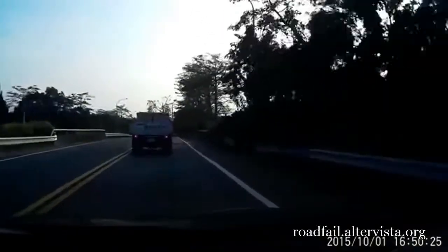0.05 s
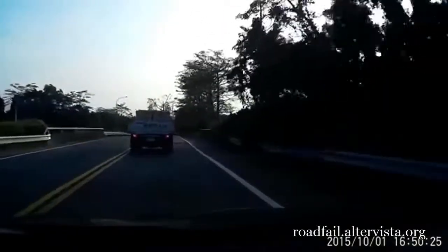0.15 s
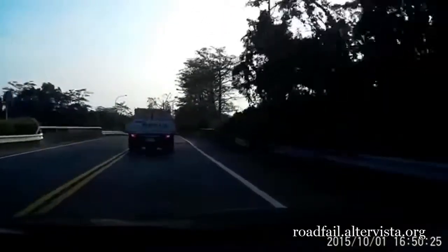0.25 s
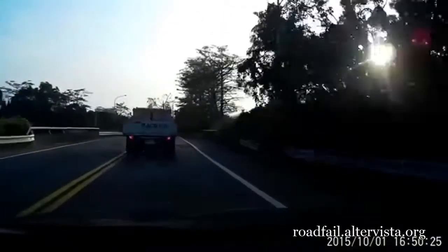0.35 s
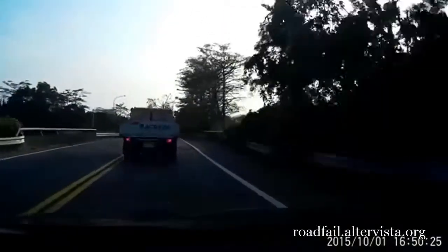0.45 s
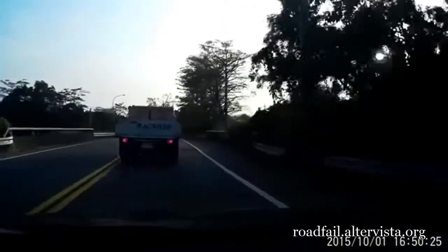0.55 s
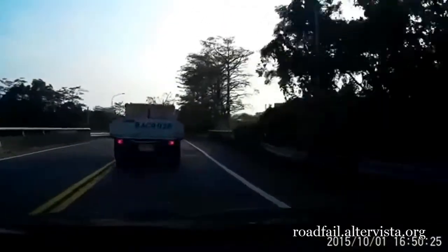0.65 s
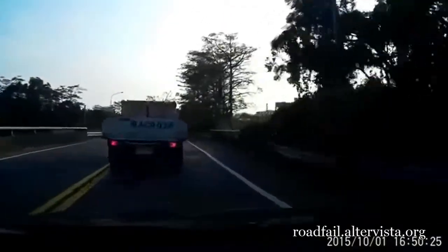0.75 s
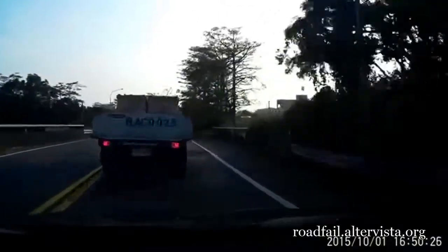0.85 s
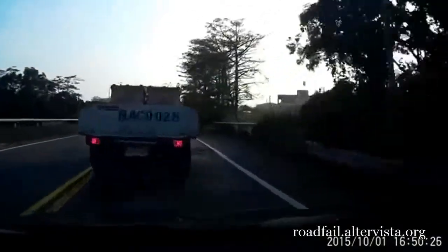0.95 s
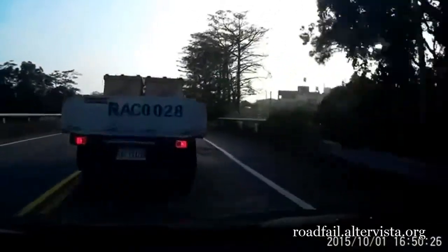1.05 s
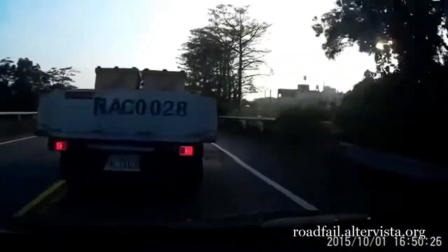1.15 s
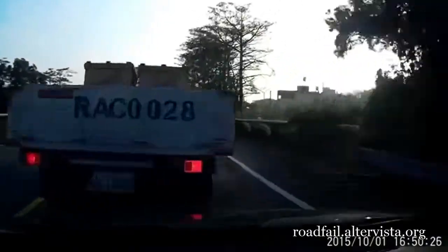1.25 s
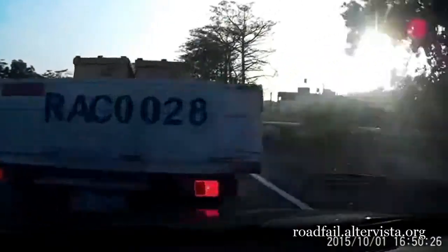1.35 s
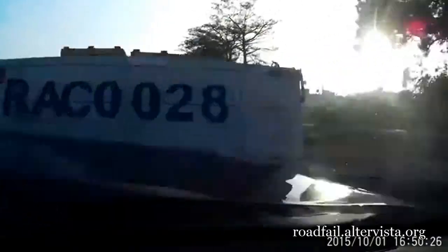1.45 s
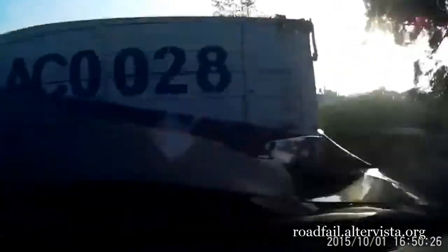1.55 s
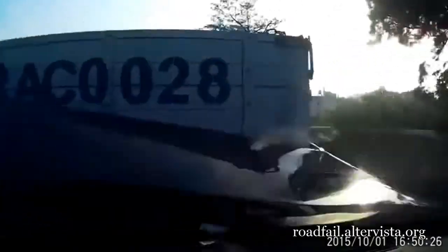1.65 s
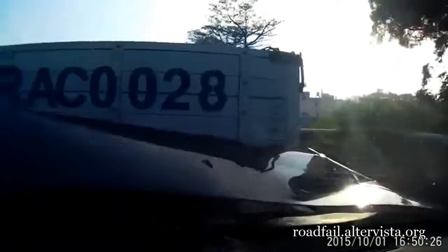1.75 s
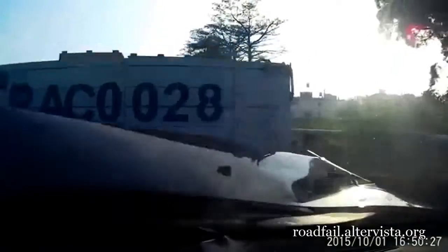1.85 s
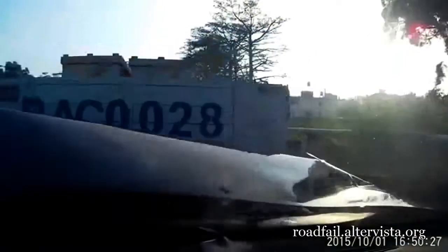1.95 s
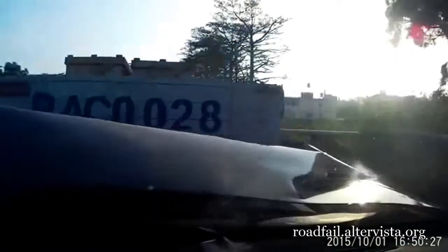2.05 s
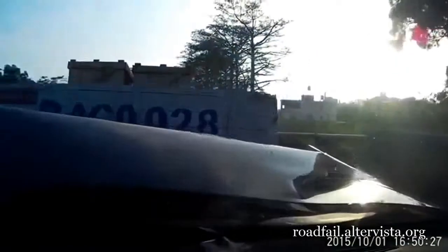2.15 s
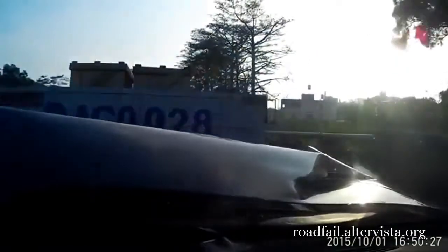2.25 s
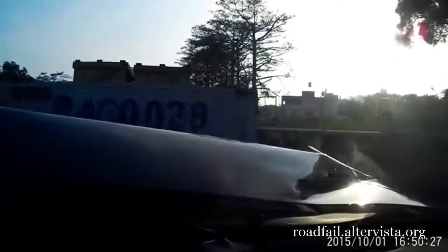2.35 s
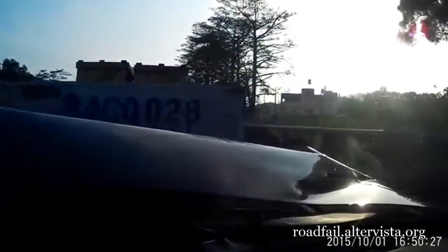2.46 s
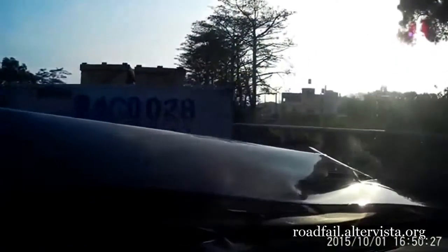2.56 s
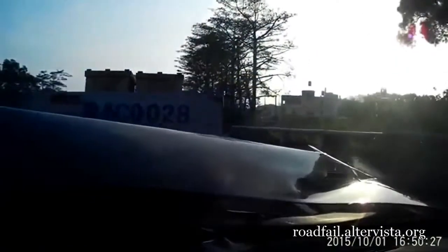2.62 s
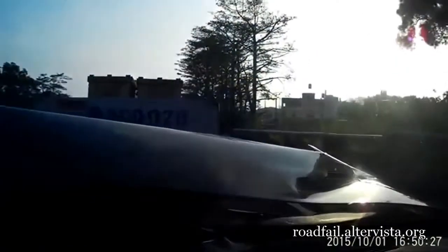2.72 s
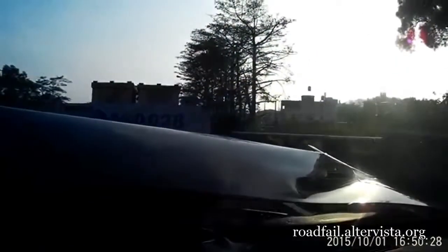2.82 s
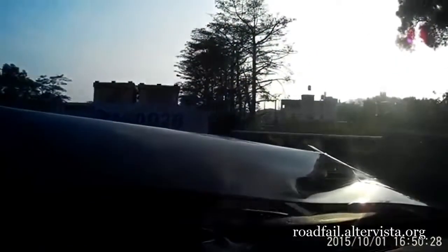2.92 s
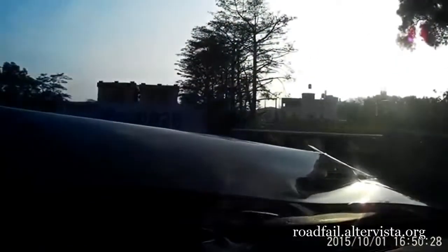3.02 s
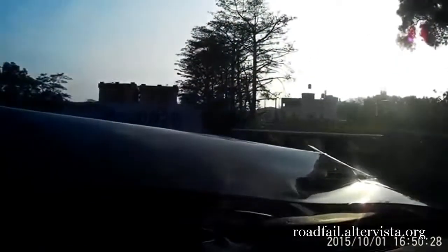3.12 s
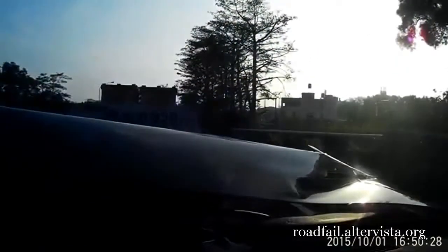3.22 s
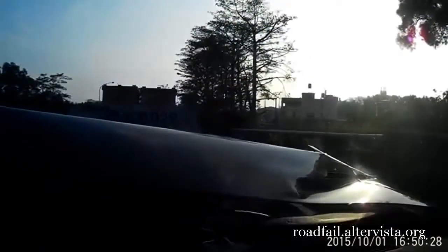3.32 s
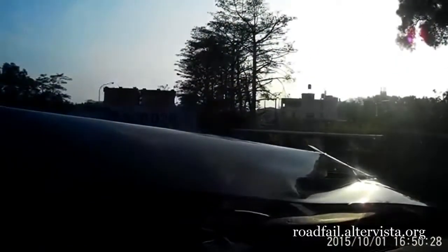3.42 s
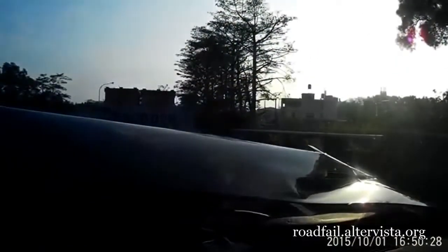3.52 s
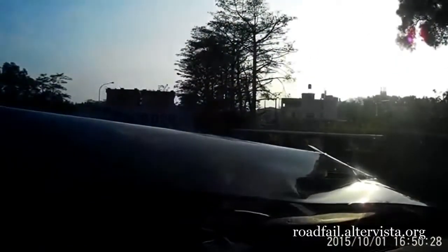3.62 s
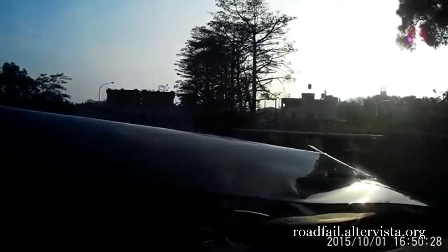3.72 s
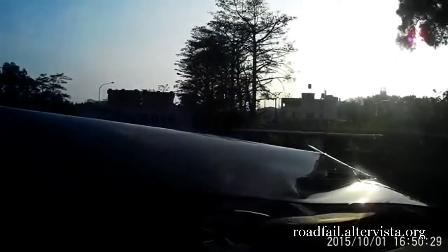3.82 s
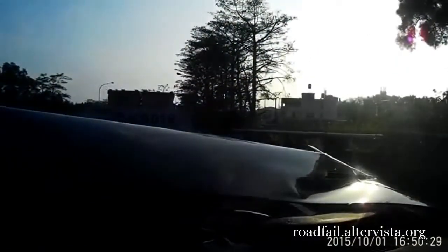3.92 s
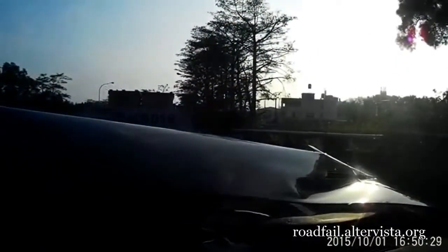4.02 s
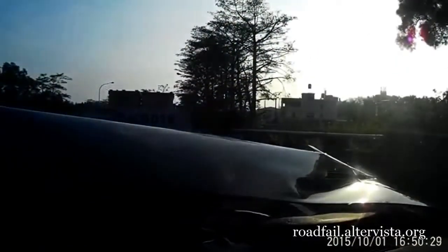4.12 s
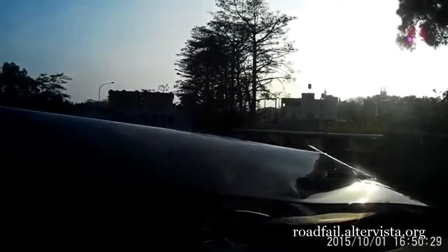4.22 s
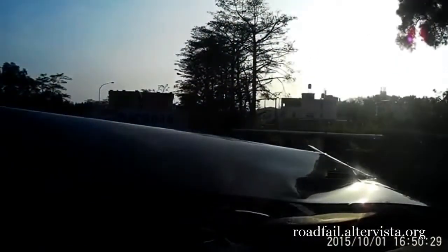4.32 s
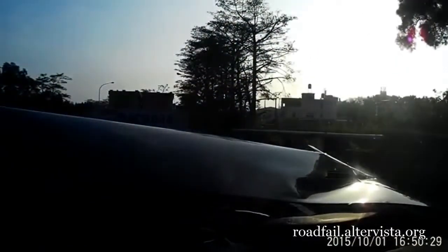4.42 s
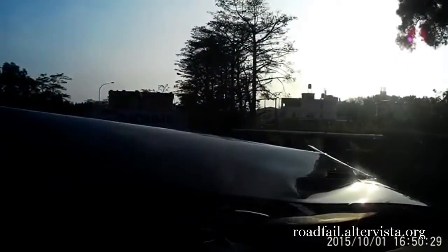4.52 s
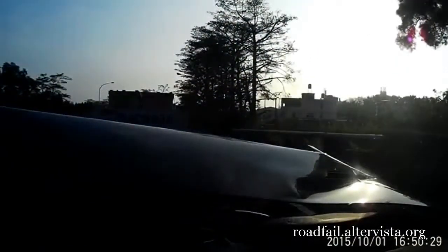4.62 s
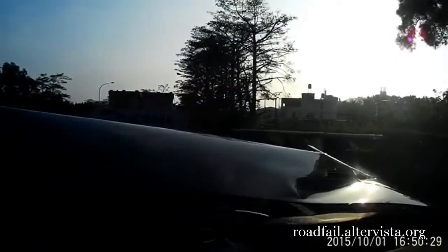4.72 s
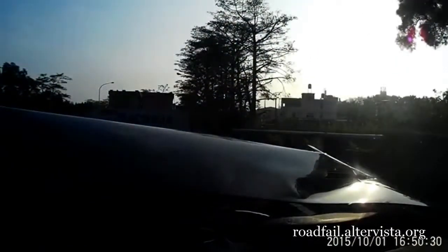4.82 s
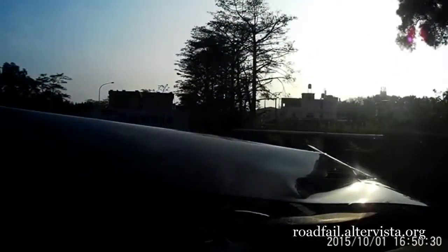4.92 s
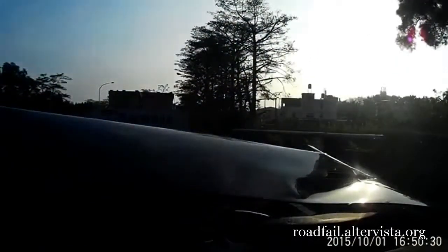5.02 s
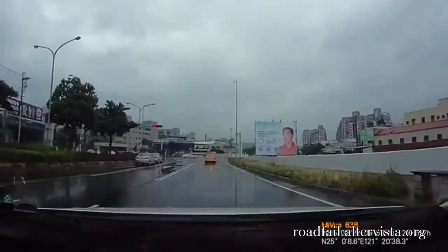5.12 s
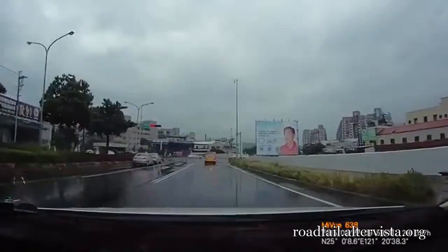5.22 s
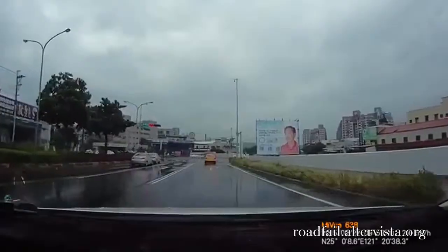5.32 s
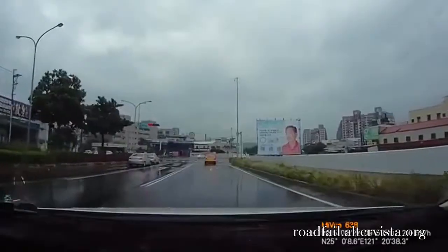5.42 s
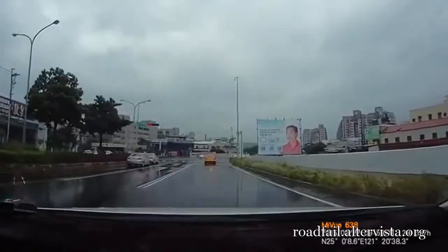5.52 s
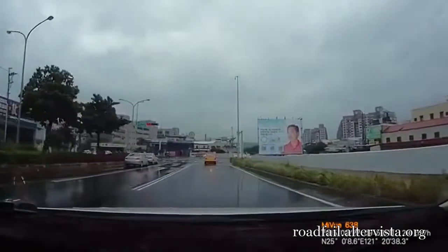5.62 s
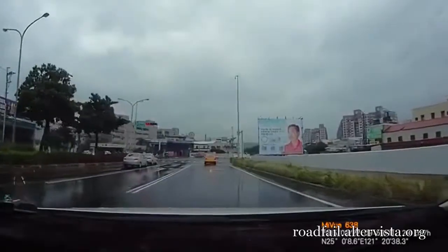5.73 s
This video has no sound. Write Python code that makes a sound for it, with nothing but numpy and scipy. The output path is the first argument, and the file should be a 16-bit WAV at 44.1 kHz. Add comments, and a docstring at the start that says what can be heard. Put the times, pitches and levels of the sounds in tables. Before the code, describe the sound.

Close, dry car cabin with a slightly saturated microphone. Tyres hum under braking over deep road rumble; the front end then crunches into a truck in repeated blows, with deep lurches, sheet metal folding, sharp trim cracks and gritty splinters. Late snaps and a creak trail off into throbbing, clattering idle, which stops abruptly into silence.

```python
"""A car runs into the back of a truck, heard from inside the car: thuds, buckling metal, cracking plastic.
Random fractures and short blows excite banks of resonances: body, panels, dashboard, trim and splinters.
Metal scrapes and creaks and fragments trickle down; slow swings of the body add deep lurches.
Braking tyres drone beforehand over road roar, which is shaped noise; the engine's firing harmonics idle on.
Faint hiss and a thin whine lie beneath, until everything stops dead."""
import sys
import numpy as np
from scipy import signal
from scipy.fft import rfft, irfft
from scipy.io import wavfile

SR = 44100
rng = np.random.default_rng(int(sys.argv[2]) if len(sys.argv) > 2 else 0)


def persist_wave(psi):
    """Save psi, clipped to +-1, as 16-bit WAV."""
    counts = np.round(np.clip(psi, -1, 1) * 32767).astype(np.int16)
    wavfile.write(sys.argv[1], SR, np.atleast_2d(counts).T)


N = 254632
TIME = np.arange(N) / SR

# Shoves in which the front end gives way; levels hold at mid-shove:
# (start [s], length [s], force [dB], dashboard judder re force [dB], breaking trim re force [dB])
CRUSHES = [(0.869, 0.34, -37, -7.5, -15), (1.115, 0.15, -30.5, -5, -10), (1.278, 0.14, -32, 4.5, -8),
           (1.447, 0.099, -27, -12, -22.5), (1.515, 0.091, -27.5, -1, -11.5),
           (1.606, .16, -23.5, -2.5, -9.5), (1.796, 0.24, -32, -5.5, -14), (2.05, 0.1, -26, -5, -17.5),
           (2.25, 0.089, -29, -12, -32), (2.383, .20, -27, -13, -31), (2.602, 0.15, -30, -4.5, -21),
           (2.802, 0.075, -35, -5.5, -17.5), (2.883, .09, -31.5, -2.5, -15),
           (2.992, 0.094, -41.5, 0.5, -6.5)]
# Heavy blows, levels before cabin reflections:
# (start [s], body peak [dB], panel re body [dB], panel pitch [Hz], decay of force [s])
THUDS = [(0.904, -9, 0, 316, 0.0066), (1.097, -15, -6, 347, 0.025), (1.3, -10, 0.5, 208, 0.0061),
         (1.347, -13, 0, 338, 0.016), (1.374, -12, -8, 506, 0.02), (1.527, -14.5, -7, 490, 0.01),
         (1.596, -14, 1.5, 240, 0.0093), (1.61, -17, 2, 222, 0.0088), (1.676, -11.5, -7, 220, 0.018),
         (1.73, -17, 7.5, 206, 0.0087), (2.131, -16, -6, 245, 0.0076), (2.244, -23, 2, 251, 0.0062),
         (2.394, -15.5, -3.5, 243, 0.0085), (2.419, -20, 2, 259, 0.012), (2.586, -31.5, 15, 332, 0.0078),
         (2.696, -24, 8, 266, 0.0053), (2.925, -27, -3.5, 460, 0.01)]
# Modes of a struck panel: (multiple of its pitch [1], width [Hz], level [dB])
PANEL_MODES = [(.68, 70, -4.5), (1, 56.1, 7.5), (1.4, 90, -6.5), (1.9, 120, -7)]
# Snaps of plastic and metal, levels before cabin reflections:
# (start [s], trim peak [dB], dashboard knock re trim [dB], splinter re trim [dB], decay of trim force [s])
CRACKS = [(.749, -29.5, -1, -13, 0.014), (.794, -30, 6, -3, .006), (.893, -30, 4, -8, .008),
          (.903, -25.5, 11, -8, 0.016), (1.077, -28.5, 8.5, -19, 0.0044), (1.147, -21.5, 4, -6.5, 0.0085),
          (1.176, -18, 7.5, -6, 0.01), (1.299, -28, 14.5, -8, 0.0027), (1.347, -28, 9.5, -20.5, 0.0079),
          (1.374, -18, 2.5, -3.5, 0.002), (1.391, -18, 1, -25.5, .0043), (1.415, -31, 11, -22.5, 0.0032),
          (1.503, -37, 16, -14.5, 0.007), (1.532, -22, 7, -21, 0.0078), (1.592, -24, 8.5, -16.5, 0.011),
          (1.609, -23.5, 10, 10, .001), (1.634, -24, 1, 6.5, 0.0021), (1.684, -29, 12.5, -1, 0.0057),
          (1.730, -17, 6, -6, .006), (1.739, -23, 4, -3.5, .014), (1.840, -29.5, 3, -12.5, 0.011),
          (1.912, -27, -1, -18, .003), (1.927, -34, -7, -19, 0.0032), (1.983, -38.5, 6, -25, .0036),
          (2.060, -25.5, 8.5, -17, 0.0039), (2.112, -36, -10, -21, .002), (2.132, -23.5, -4, -19, 0.0036),
          (2.151, -26.5, 2, -16, 0.0027), (2.262, -46.5, -4.5, -3.5, 0.0062), (2.421, -30, 10, -18, 0.0059),
          (2.606, -33, 11, -29.5, .006), (2.670, -23, -11.5, -29.5, 0.0016), (2.701, -13.5, 5, -21, 0.002),
          (2.732, -23.5, 5, -30.5, 0.0031), (2.767, -26, 2, -25, 0.0015), (2.904, -34.5, 13, -18, 0.0052),
          (2.926, -42, 17, -26, 0.0015), (2.949, -28.5, 11.5, -33, 0.0049), (3.045, -29.5, -1, -12, 0.0053),
          (3.071, -38.5, 9, -20, 0.0073), (3.344, -39.5, -16, -18, 0.014), (3.541, -41.5, -14, 0, 0.0048),
          (3.558, -43, -16, -14, 0.011)]
# Resonances of the car body: (frequency [Hz], width [Hz], level [dB])
BODY_MODES = [(34.4, 27, -4), (58.4, 37, -3), (120, 35, -2.5), (220, 19, -16.5)]
# Resonances of the sheet-metal panels: (frequency [Hz], width [Hz], level [dB])
SHEET_MODES = [(235, 32, -1), (344.2, 67, -2), (397.6, 18, -0.5), (461, 40, -12.5), (645, 73, -14)]
# Resonances of the dashboard: (frequency [Hz], width [Hz], level [dB])
DASHBOARD_MODES = [(520, 236, -6.5), (663, 206, -3), (832, 170, -11), (1070, 190, -19.5)]
# Resonances of the trim: (frequency [Hz], width [Hz], level [dB])
TRIM_MODES = [(1395, 65, 4), (1847, 50, 1), (1988, 162, -5), (2705, 270, -9), (3170, 330, -10.5),
              (3750, 87, -16)]
# Resonances of bright splinters and grit: (frequency [Hz], width [Hz], level [dB])
SPLINTER_MODES = [(4130, 1700, 1), (5630, 1000, 4.5), (6060, 380, 4), (6380, 420, 2), (7880, 1300, -2.5),
                  (9250, 400, -0.5), (10160, 1100, -6.5), (13600, 1800, -17)]
# Swings of the whole car on its springs and mounts: (time of crest [s], peak level [dB])
LURCHES = [(1.0, -31), (1.23, -29), (1.38, -27.5), (1.62, -20), (1.692, -13.5), (2.0, -29), (2.151, -27),
           (2.43, -26), (2.529, -21)]
# Metal rubbing on metal: (time [s], pitch [Hz], level [dB])
SCRAPE = [(1.10, 830, -37), (1.18, 890, -28), (1.24, 930, -32), (1.30, 980, -31), (1.36, 914, -41.5),
          (1.42, 835, -41)]
# Creaks of the wreck: (start [s], length [s], starting pitch [Hz], level [dB])
CREAKS = [(2.6, 0.27, 642, -32.5), (2.792, 0.183, 766, -41)]
# Drone of the braking tyres: (time [s], pitch [Hz], level [dB])
TYRE_DRONE = [(0, 370, -34.5), (.15, 374, -35.5), (.3, 369, -38.5), (.5, 376, -36.5), (.68, 376, -33),
              (.84, 371, -33), (.92, 370, -46)]
# Showers of glassy crumbs: (start [s], length [s], level [dB])
SHOWERS = [(0.732, 0.45, -54), (2.853, 0.22, -57)]
# Resonances of the crumbs: (frequency [Hz], width [Hz], level [dB])
CRUMB_MODES = [(3200, 900, 5.5), (5550, 690, 4), (6300, 920, 0.5), (9300, 1500, -12.5), (10700, 580, -11.5)]
# Small falling fragments: (start [s], peak level [dB], pitch [Hz], decay of force [s])
FRAGMENTS = [(2.889, -53, 10800, 0.03), (3.23, -60, 10900, 0.018), (3.235, -57.5, 4760, 0.021),
             (4.348, -42, 5760, 0.007)]
# Roar of the tyres and cabin rumble: (time [s], level [dB])
ROAD_LEVEL = [(0, -29), (.3, -30), (.55, -28.5), (.9, -24.5), (1.7, -30.5), (1.85, -30), (2.3, -30),
              (2.8, -32), (3.1, -45), (3.4, -47.5)]
# Relative spectrum of that roar: (frequency [Hz], level [dB])
ROAD_SPECTRUM = [(15, -28), (25, 13.5), (50, -6.5), (80, -1.5), (120, -0.5), (175, -7.5), (310, -7.5),
                 (450, -9.5), (850, -19), (1150, -27), (1400, -25.5), (1700, -40.5), (3400, -45.5),
                 (4300, -54), (5800, -52), (7200, -58), (15000, -70.5)]
# Mean firing rate of the idling engine: (time [s], rate [firings/s])
IDLE_RATE = [(3.1, 26.7), (3.49, 26.7), (5.2, 27.6)]
# Relative strength of the firing harmonics: (multiple of firing rate [1], level [dB])
FIRING_ORDERS = [(1, -1), (2, -4.5), (3, -17.5), (4, -14), (13, -10.5)]
# Relative spectrum of the engine clatter: (frequency [Hz], level [dB])
CLATTER_SPECTRUM = [(20, -3), (50, 1.5), (110, -0.5), (165, -8.5), (230, -0.5), (370, -3.5), (440, -9),
                    (600, -5), (730, -12), (860, -9), (1100, -19.5), (1400, -18.5), (1700, -33),
                    (3400, -36.5), (4300, -43), (5800, -44), (9000, -56)]
# Course of the hiss and whine, which dip and recover: (time [s], relative level [dB])
HISS_COURSE = [(0, -1.5), (1.2, 4), (1.8, -13), (2.4, -0.5), (2.9, 0.5), (5.27, -2)]

CRUSH_ATTACK_S, CRUSH_RELEASE_S, CRUSH_SLOPE_DB_PER_S = 0.0063, 0.025, -2.5
PANEL_DB = -3.5  # panels against the body
CRACKLE_DB = -7  # lone small snaps against the dense crunch
GRIT_DB, GRIT_FOLLOWS = -46, 1.44  # level at the hardest crunch; exponent of growth with breaking
TRIM_CLICK, KNOCK_CLICK, SPLINTER_CLICK = .14, 0.53, .11  # share of force energy in the single sharp break
KNOCK_LINGERS, SPLINTER_LINGERS = 1.1, 1.4  # force decay as a multiple of that of the trim
SOFT_SNAP_TILT = 0.083  # trim tilt in dB per octave for each dB of relative splinter level
HEAVE_HZ, LURCH_S = 32, .028
CREAK_RISE_HZ_PER_S = 240
SHOWER_ATTACK_S, SHOWER_RELEASE_S = 0.067, .025
RATTLE_DB = -67.5
IDLE_FROM_S, IDLE_RISE_S, IDLE_SETTLE_DB_PER_S = 2.706, 0.49, 1.5
THROB_DB, CLATTER_DB = -36, -37.5
WHINE_HZ, WHINE_DB, HISS_DB = 7950, -75.5, -67
STOP_S, CUTOFF_HZ = 5.265, 15100


def crush_levels():
    """Yielding under load: the powers of successive shoves add, for force, judder and breaking trim."""
    power = np.zeros((3, N))
    for s, length, db, judder_db, trim_db in CRUSHES:
        # the negative slope makes each shove weaken slightly until it lets go
        slope = from_db(CRUSH_SLOPE_DB_PER_S * (np.clip(TIME - s, 0, length) - length / 2))
        shove = slope * swell(s, length, CRUSH_ATTACK_S, CRUSH_RELEASE_S)
        gains = from_db([db, db + judder_db, db + trim_db])
        power += np.outer(gains, shove) ** 2
    return np.sqrt(power)


def folding(force, judder):
    """Impulsive excitation: buckling jerks ring the modes of body, panels and dashboard."""
    jerks = fractures(per_s=900, spread_db=3.0)
    body = rms_one(resonate(jerks, BODY_MODES))
    panels = rms_one(resonate(jerks, SHEET_MODES))
    dashboard = rms_one(resonate(jerks, DASHBOARD_MODES))
    return force * (body + from_db(PANEL_DB) * panels) + judder * dashboard


def crunching(breaking):
    """Fracture noise: clumped and lone breaks ring the trim; grit grows faster than the breaking."""
    clumps = from_db(2.0 * drift(49))
    crunch = rms_one(resonate(clumps * fractures(per_s=1200, spread_db=3.0), TRIM_MODES))
    snaps = fractures(per_s=70, spread_db=1.5)
    crackle = from_db(CRACKLE_DB) * rms_one(resonate(snaps, TRIM_MODES))
    grit_level = from_db(GRIT_DB) * (breaking / breaking.max()) ** GRIT_FOLLOWS
    grit = rms_one(resonate(clumps * fractures(per_s=2600, spread_db=1.5), SPLINTER_MODES))
    return breaking * (crunch + crackle) + grit_level * grit


def thuds():
    """Impact response: a short blow rings the body modes and those of a panel with its own pitch."""
    out = np.zeros(N)
    for s, db, panel_db, panel_hz, decay in THUDS:
        panel = [(multiple * panel_hz, width, level) for multiple, width, level in PANEL_MODES]
        add(out, s, from_db(db) * blow(BODY_MODES, decay, rise=0.0065))
        add(out, s, from_db(db + panel_db) * blow(panel, decay, rise=0.0049))
    return out


def cracks():
    """Brittle fracture: each snap rings trim, dashboard and splinter; a weak splinter means duller trim."""
    out = np.zeros(N)
    for s, db, knock_db, splinter_db, decay in CRACKS:
        tilt = SOFT_SNAP_TILT * splinter_db
        trim = [(hz, width, level + tilt * np.log2(hz / TRIM_MODES[0][0]))
                for hz, width, level in TRIM_MODES]
        snap = blow(trim, decay, rise=0.002754, click=TRIM_CLICK)
        knock = blow(DASHBOARD_MODES, decay * KNOCK_LINGERS, rise=.001, click=KNOCK_CLICK)
        splinter = blow(SPLINTER_MODES, decay * SPLINTER_LINGERS, rise=.0022, click=SPLINTER_CLICK)
        add(out, s, from_db(db) * snap)
        add(out, s, from_db(db + knock_db) * knock)
        add(out, s, from_db(db + splinter_db) * splinter)
    return out


def heaving():
    """Mass on springs: each lurch is a deep sine swing under a Gaussian envelope."""
    out = 0
    for s, db in LURCHES:
        t = TIME - s
        swing = np.sin(2 * np.pi * (HEAVE_HZ * t + rng.random()))
        out = out + from_db(db) * np.exp(-(t / LURCH_S) ** 2) * swing
    return out


def friction():
    """Friction-driven vibration: a nearly clean tyre drone, a hoarse scrape, then rising creaks."""
    out = slide(TYRE_DRONE, width_hz=14, steady=3.2)
    out = out + slide(SCRAPE, width_hz=87)
    for s, length, hz, db in CREAKS:
        pitch = hz + CREAK_RISE_HZ_PER_S * np.clip(TIME - s, 0, length)
        level = from_db(db) * swell(s, length, attack=0.029, release=0.022)
        out = out + level * wavering_tone(pitch, width_hz=47, steady=1.8)
    return out


def slide(rows, width_hz, steady=0):
    """Narrow-band oscillation: a friction tone follows a pitch and level curve."""
    hz, db = in_time(rows)
    return from_db(db) * during(rows) * wavering_tone(hz, width_hz, steady)


def showers():
    """Superposed small impacts: dense random clicks ring the modes of glassy crumbs."""
    flow = sum(from_db(db) * swell(s, length, SHOWER_ATTACK_S, SHOWER_RELEASE_S)
               for s, length, db in SHOWERS)
    return flow * rms_one(resonate(fractures(per_s=2000, spread_db=2.0), CRUMB_MODES))


def fragments():
    """Impact of a small object: a broad tick together with a narrower ring at its own pitch."""
    out = np.zeros(N)
    for s, db, hz, decay in FRAGMENTS:
        modes = [(hz, 220, 0), (hz, hz * .5, -22), (hz * 1.05, 400, -11)]
        add(out, s, from_db(db) * blow(modes, decay, rise=0.0019))
    return out


def rattle():
    """Intermittent contact: loose trim ticks faintly until the first shove."""
    rolling = swell(0, CRUSHES[0][0], attack=0.6, release=.05)
    ticks = fractures(per_s=250, spread_db=3)
    return from_db(RATTLE_DB) * rolling * rms_one(resonate(ticks, [(3400, 690, 4.5), (5530, 986, -2.5)]))


def cabin(x, t60, wet_db):
    """Reverberation: dense, short, decaying reflections from glass and upholstery."""
    t = np.arange(SR // 3) / SR
    echoes = rng.standard_normal(len(t)) * from_db(-60 * t / t60) * (t > .003)
    return x + from_db(wet_db) * signal.fftconvolve(x, echoes / np.linalg.norm(echoes))[:N]


def road():
    """Broadband rolling noise: the roar of the tyres through the floor wanders slightly in level."""
    db, = in_time(ROAD_LEVEL)
    return from_db(db + 1.0 * drift(24)) * noise(ROAD_SPECTRUM)


def engine():
    """Periodic excitation: firing harmonics rock the cabin and the firing phase modulates clatter."""
    rate, = in_time(IDLE_RATE)
    phase = 2 * np.pi * np.cumsum(rate * (1 + 0.0062 * drift(3.3))) / SR
    throb = 0
    for multiple, level in FIRING_ORDERS:
        strength = from_db(level + 0.56 * drift(6.9))
        throb = throb + strength * np.sin(round(multiple) * phase + rng.uniform(0, 2 * np.pi))
    clatter = noise(CLATTER_SPECTRUM) * from_db(0.88 * np.cos(phase))
    # the engine emerges as the wreck stops, then slowly calms
    t = TIME - IDLE_FROM_S
    effort = np.clip(t / IDLE_RISE_S, 0, 1) * from_db(-IDLE_SETTLE_DB_PER_S * t)
    return effort * (from_db(THROB_DB) * rms_one(throb) + from_db(CLATTER_DB) * rms_one(clatter))


def blow(modes, decay, rise, click=0):
    """Transient excitation: a noisy burst of force, with a sharp break at its crest, rings the modes; peak one."""
    t = np.arange(SR // 4) / SR
    fall = np.exp(-np.maximum(t - rise, 0) / max(decay, 1e-3))
    force = rng.standard_normal(len(t)) * np.minimum(t / rise, 1) ** 2 * fall
    share = np.clip(click, 0, .9)
    force = np.sqrt(1 - share) * force / np.linalg.norm(force)
    force[int(rise * SR)] += np.sqrt(share)
    ring = resonate(force, modes, vary_db=2)
    return ring / np.abs(ring).max()


def resonate(force, modes, vary_db=0):
    """Modal superposition: parallel resonances of alternating sign, band-limited to their range."""
    out = 0
    for k, (hz, width, db) in enumerate(modes):
        r = np.exp(-np.pi * width / SR)
        poles = [1, -2 * r * np.cos(2 * np.pi * hz / SR), r * r]
        ring = signal.lfilter([1, 0, -1], poles, force + 1e-18)
        gain = from_db(db + vary_db * rng.standard_normal()) * (1 - r * r) / 2
        out = out + (-1) ** k * gain * ring
    edges = [modes[0][0] * .7, min(modes[-1][0] * 1.4, .45 * SR)]
    return signal.sosfilt(signal.butter(2, edges, "band", fs=SR, output="sos"), out)


def fractures(per_s, spread_db):
    """Random point process: clicks of either sign, most small and a few large."""
    sizes = from_db(spread_db * np.minimum(rng.exponential(1, N), 4)) * rng.choice([-1, 1], N)
    return sizes * (rng.random(N) < per_s / SR)


def wavering_tone(hz, width_hz, steady=0):
    """Narrow-band noise: strength and phase of a tone wander around a steady part; unit rms."""
    phase = 2 * np.pi * np.cumsum(hz * np.ones(N)) / SR
    in_phase = (steady + drift(width_hz)) * np.cos(phase)
    return rms_one(in_phase + drift(width_hz) * np.sin(phase))


def noise(colour):
    """Spectral shaping: white noise is weighted to a given spectrum at unit rms."""
    hz, db = np.transpose(colour)
    bins = np.log(np.arange(N // 2 + 1) * SR / N + 1e-3)
    weights = from_db(np.interp(bins, np.log(hz), db, left=-90, right=-90))
    return rms_one(irfft(rfft(rng.standard_normal(N)) * weights, N))


def drift(rate):
    """Low-passed randomness: a smooth wandering of unit rms, rate in Hz, drawn at every 40th sample."""
    r = np.exp(-80 * np.pi * rate / SR)
    slow = signal.lfilter([1], [1, -2 * r, r * r], rng.standard_normal(N // 40 + 2002))[2000:]
    return np.interp(np.arange(N) / 40, np.arange(len(slow)), rms_one(slow))


def swell(start, length, attack, release):
    """Amplitude envelope: linear attack, hold and exponential release, times in seconds."""
    t = TIME - start
    return np.clip(t / attack, 0, 1) * np.exp(-np.clip((t - length) / release, 0, 20))


def during(rows):
    """Gating: one over the span of a curve, with short fades outside it."""
    first, last = rows[0][0], rows[-1][0]
    return np.interp(TIME, [first - .03, first, last, last + .03], [0, 1, 1, 0])


def in_time(rows):
    """Linear interpolation: each column of a curve at every sample."""
    s, *columns = np.transpose(rows)
    return [np.interp(TIME, s, c) for c in columns]


def add(out, s, sound):
    """Superposition: mix a sound in at a time in seconds."""
    start = int(s * SR)
    out[start:start + len(sound)] += sound[:N - start]


def from_db(db):
    """Logarithmic level: decibels to amplitude gain."""
    return 10 ** (np.asarray(db) / 20)


def rms_one(x):
    """Normalisation by mean power: scale to unit rms."""
    return x / np.sqrt(np.mean(x ** 2) + 1e-20)


def scene():
    """Superposition: the collision with its cabin reflections over lurches, friction, road and engine."""
    force, judder, breaking = crush_levels()
    crash = folding(force, judder) + crunching(breaking) + thuds() + cracks()
    crash = crash + showers() + fragments() + rattle()
    return (cabin(crash, t60=0.072, wet_db=-10.0) + heaving() + friction() + road() + engine())[None]


def record(dry):
    """Saturation and band limiting: hiss and whine join, peaks are rounded and the sound stops abruptly."""
    course_db, = in_time(HISS_COURSE)
    whine = from_db(WHINE_DB) * wavering_tone(WHINE_HZ, width_hz=70, steady=1.8)
    hiss = from_db(HISS_DB) * rng.standard_normal(N)
    x = dry + from_db(course_db) * (hiss + whine)
    top = .5  # amplitude that the rounded peaks approach
    limited = x / (1 + (x / top) ** 4) ** (1 / 4)
    running = np.clip((STOP_S - TIME) / .004, 0, 1)
    low_pass = signal.ellip(10, .1, 90, CUTOFF_HZ, fs=SR, output="sos")
    return signal.sosfilt(low_pass, limited * running)


dry = scene()
out = record(dry)
persist_wave(out)
```